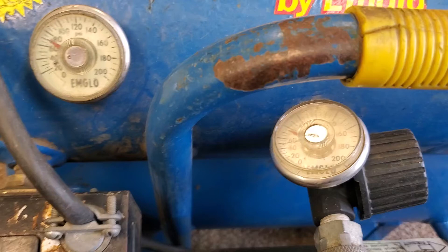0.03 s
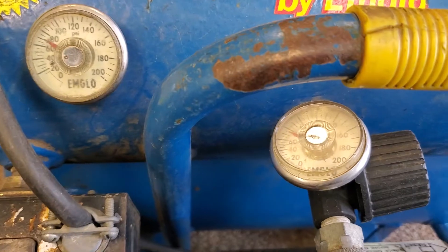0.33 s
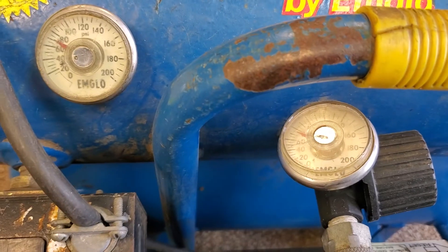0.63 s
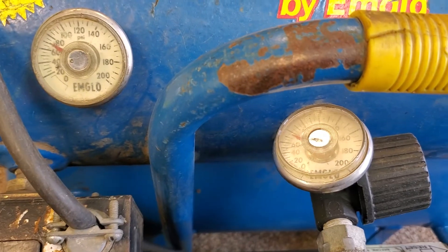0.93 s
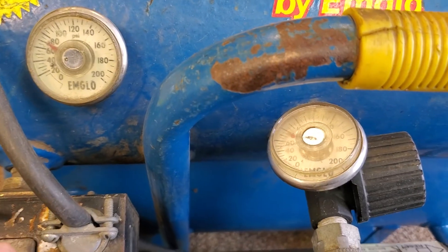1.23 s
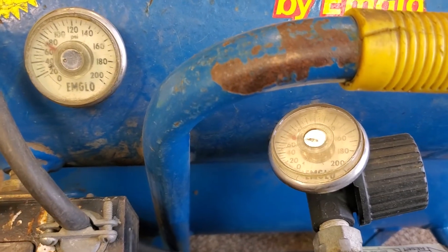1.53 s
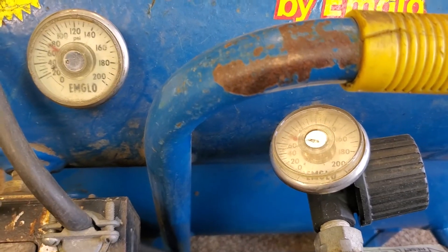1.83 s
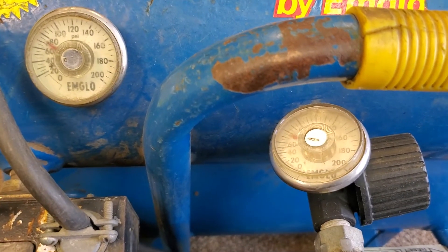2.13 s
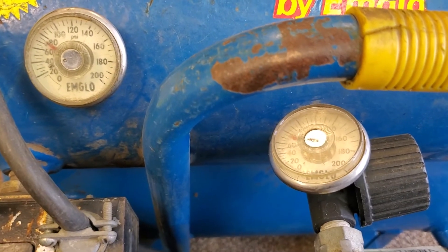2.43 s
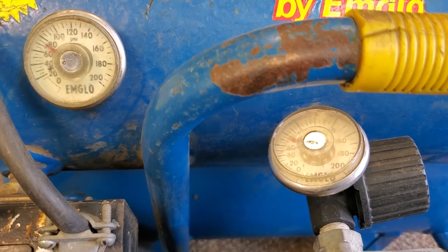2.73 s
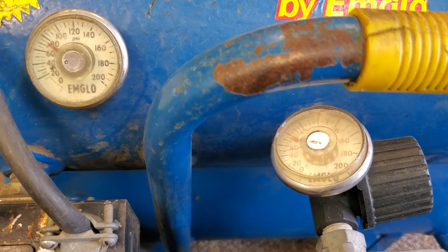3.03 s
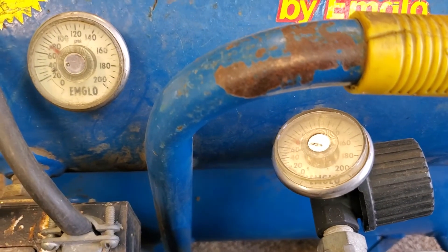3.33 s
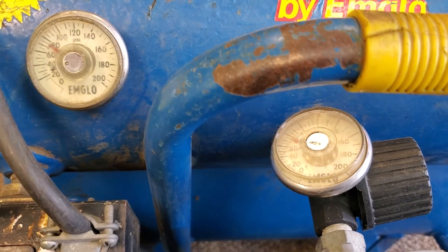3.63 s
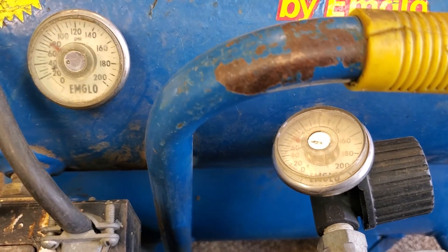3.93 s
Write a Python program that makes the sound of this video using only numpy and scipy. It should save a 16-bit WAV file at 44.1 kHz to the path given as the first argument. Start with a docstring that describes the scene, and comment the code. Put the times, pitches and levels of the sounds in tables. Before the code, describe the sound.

An air compressor snaps on and runs with a loud motor drone and hiss.

```python
"""A small piston air compressor starts in a quiet room, close by and a little to the left.
Low rumble first. At 1.1 s the switch snaps; the first strokes knock, reed valves groan and squeak, air puffs.
By 1.35 s the induction motor is at speed: a loud drone that beats with the rotor slip, over a thin hiss.
Each turn gives an intake and a discharge stroke, two gusts of air and a ringing valve click.
At 3.15 s rising pressure opens a leak and the hiss grows."""
import sys
import numpy as np
from scipy import signal
from scipy.fft import rfft, irfft, next_fast_len
from scipy.io import wavfile
from scipy.ndimage import map_coordinates

SR = 44100
rng = np.random.default_rng(int(sys.argv[2]) if len(sys.argv) > 2 else 0)


def file_out(sig):
    """Save sig as 16-bit WAV at sys.argv[1]."""
    # one column per channel
    cols = np.atleast_2d(sig).T
    # limit, then scale
    lim = np.clip(cols, -1, 1)
    pcm = np.round(lim * 32767).astype(np.int16)
    wavfile.write(sys.argv[1], SR, pcm)


N = 176400
T = np.arange(N) / SR
RUN_HZ, MAINS_HZ = 56.55, 60

# left minus right (frequency [Hz], level [dB])
BALANCE_DB = [(60, 1.2), (110, 0.4), (200, 2.3), (380, 0.7), (560, 6.4), (750, 7.5), (1290, 10), (2400, 11),
              (4400, 7.5), (7000, 10), (9300, 2.4), (10400, 10.4), (11500, 4.3), (15000, 11.9)]
# left-right likeness (frequency [Hz], correlation [0-1])
COHERENCE = [(130, 0.62), (640, 1), (1400, 0.69), (3000, 0.084)]
# shaft speed (time [s], speed [turns/s])
SHAFT_HZ = [(1.11, 6), (1.16, 20), (1.25, 41), (1.3, 55), (1.33, 56.54), (2.8, 56.54), (3.3, 56.59)]
# pump and tank resonances (frequency [Hz], width [Hz], gain [dB])
BODY_MODES = [(222, 116, -2.5), (552, 119, -0.5), (1270, 325, -21.5)]
# flow swells in one turn (place [turns], width [turns], share of depth [0-1])
GUST_SHAPE = [(.17, .13, 1), (.79, .05, .8)]

# noise spectra (frequency [Hz], relative density [dB])
RUMBLE_SPECTRUM = [(20, -12), (50, 5.5), (100, 3.5), (150, -10.5), (260, -18), (450, -31), (1000, -39.5),
                   (3000, -39), (9000, -40.5), (15000, -31)]
SNAP_SPECTRUM = [(200, -16), (1500, -6), (3000, 0), (7000, -2), (10000, -1.5), (15800, 3)]
HISS_SPECTRUM = [(1500, -16), (3500, -12), (6800, -1), (7600, -20.5), (10000, -17), (12200, 1.5),
                 (13200, 3.5), (14400, 7), (15000, 11.5), (15800, -8.5)]
AIR_SPECTRUM = [(25, -14), (90, 0), (280, -2.5), (480, 3), (610, 12.5), (780, 1), (1000, 1.5), (1230, 5),
                (1550, 1.5), (2100, 3), (2500, -2.5), (3000, 0.5), (3550, 1), (4250, -5), (5100, -9.5),
                (5800, -4), (6300, -10.5), (6800, -4), (7600, -15), (9000, -8.5), (12000, -11.5),
                (16000, -26)]
PUFF_SPECTRUM = [(1500, -24), (4500, -1.5), (6500, -5), (8000, -10), (10200, 0), (12000, -3), (14000, 2),
                 (15800, 3)]
CLICK_SPECTRUM = [(500, -45), (1800, -5), (3300, -7), (4600, 10.5), (6800, -5.5), (7800, -7), (9300, -6),
                  (12000, -3.5), (16000, -17)]
LEAK_SPECTRUM = [(2500, -27), (3250, -3), (3700, -3.5), (4300, -3.5), (5200, -11.5), (9000, -10.5),
                 (12200, -5.5), (13000, 0.5), (14000, 4), (15800, -8)]

# envelopes (time [s], level [dB])
HISS_DB = [(1.103, -30), (1.3, -38.5), (1.38, -30), (2.2, -32), (2.7, -32), (3.12, -31), (4, -29)]
DRONE_DB = [(1.127, -42), (1.15, -35.5), (1.24, -24), (1.29, -23.5), (1.35, -18), (1.5, -15.5),
            (1.9, -16.5), (2.6, -15.5), (3.0, -15), (3.4, -17), (4, -16.5)]
AIR_DB = [(1.11, 0), (1.135, -26.5), (1.17, -27), (1.205, -32.5), (1.3, -30.5), (1.37, -21.5),
          (1.44, -22.5), (1.6, -25), (2.4, -26.5), (2.95, -23.5), (3.4, -25.5), (4, -25)]
LEAK_DB = [(3.15, -39), (3.18, -26), (3.6, -26.5), (4, -25.5)]

# single events (time [s], level [dB])
SWITCH_HITS = [(1.0975, -39), (1.102, -13.5), (1.115, -26)]
KNOCK_HITS = [(1.129, -14), (1.1795, -7), (1.2235, -15), (1.2395, -10), (1.2525, -17), (1.265, -15),
              (1.321, -15), (1.3565, -15), (1.374, -15)]
AIR_PUFFS = [(1.175, -22.5), (1.22, -23), (1.23, -22), (1.253, -18), (1.263, -30), (1.275, -23),
             (1.294, -22.5), (1.314, -30), (1.332, -26)]
HARD_CLICKS = [(1.6325, -19), (1.7737, -19), (2.0923, -19), (2.9418, -17.5), (3.0825, -19), (3.8952, -18.5),
               (3.9665, -19)]

# faint rustle (time [s], width [s], level [dB])
RUSTLE_SWELL = (0.37, 0.1, -70.5)
# groaning reed (time [s], pitch [Hz], level [dB])
GROAN_PATH = [(1.105, 590, -37), (1.135, 570, -26), (1.155, 570, -27), (1.188, 605, -19), (1.203, 625, -13),
              (1.215, 650, -20), (1.224, 540, -19), (1.255, 490, -29)]
# shaft harmonics from order 1 up (relative level [dB])
HARMONICS_DB = [-6.3, 0, -8, -9, -11, -10, -16, -4.3, -5.5, -2.5, -12, -9.3, -21, -18, -25, -20, -19, -30,
                -19, -26, -20, -22, -19, -20, -25, -21, -26, -21, -25, -25]
# air noise that recurs every 8 turns (frequency [Hz], power share [0-1])
RECURRING_SHARE = [(700, .8), (3000, .25)]
# reed valve notes (time [s], pitch [Hz], width [s], level [dB], roughness [rad])
REED_NOTES = [(1.137, 720, .006, -24, 0.17), (1.156, 3170, 0.006, -19, 0.65),
              (1.175, 230, 0.012, -28, 0.12), (1.195, 313, 0.012, -27, 0.11), (1.227, 220, .008, -22, .1),
              (1.242, 130, .008, -23, .1), (1.425, 6680, .04, -28.5, 2.3)]
# valve plate modes (frequency [Hz], relative level [dB])
PLATE_MODES = [(3215, -11.5), (4260, -15.5), (5700, -21), (6680, -21)]


def amp(db):
    return 10 ** (np.asarray(db) / 20)


def unit(x):
    """Scale the channel mean to rms 1."""
    return x / np.sqrt(np.mean(np.atleast_2d(x).mean(0) ** 2) + 1e-20)


def along(points, hz):
    """Interpolate on a log frequency axis."""
    f, v = np.transpose(points)
    return np.interp(np.log(hz + 1), np.log(f + 1), v)


def level(points):
    """Gain per sample, silent before the first point."""
    return amp(np.interp(T, *np.transpose(points), left=-200))


def wobble(rate_hz):
    """Smooth random curve."""
    return map_coordinates(rng.standard_normal(int(N * rate_hz / SR) + 4), [T * rate_hz])


def filtered(x, response):
    """Apply response(hz)."""
    m = next_fast_len(N + SR // 2)
    return irfft(rfft(x, m) * response(np.fft.rfftfreq(m, 1 / SR)), m)[..., :N]


def sides(db):
    """Left and right gains for a level difference."""
    g = amp(db)
    return np.array([2 * g, 2 + 0 * g]) / (1 + g)


def placed(x, left_lag_s=.00018):
    """Pump position: louder and slightly later on the left."""
    delay_s = np.array([[.5], [-.5]]) * left_lag_s
    return filtered(x, lambda hz: sides(along(BALANCE_DB, hz)) * np.exp(-2j * np.pi * hz * delay_s))


def coloured(pair, spectrum):
    """Shape two noises into stereo, alike in the bass."""
    width = lambda hz: np.tan(np.arccos(np.clip(along(COHERENCE, hz), -1, 1)) / 2)
    mid, side = filtered(pair, lambda hz: amp(along(spectrum, hz)) * np.array([1 + 0 * hz, width(hz)]))
    return unit(np.array([mid + side, mid - side]))


def noise(spectrum):
    return coloured(rng.standard_normal((2, N)), spectrum)


def blend(a, b, share):
    """Mix by power: share(hz) of a, the rest of b."""
    return filtered(a, lambda hz: share(hz) ** .5) + filtered(b, lambda hz: (1 - share(hz)) ** .5)


def bursts(hits, t60_s):
    """Envelope of sharp, decaying hits."""
    impulses = np.zeros(N)
    for s, db in hits:
        impulses[int(np.clip(s * SR, 0, N - 1))] += amp(db)
    return signal.lfilter([1], [1, -amp(-60 / (t60_s * SR))], impulses)


def swell(at_s, width_s):
    return np.exp(-.5 * ((T - at_s) / width_s) ** 2)


def body(hz):
    """Causal response of pump and tank."""
    return sum((-1) ** k * amp(db) * 1j * hz * width / (centre ** 2 - hz ** 2 + 1j * hz * width)
               for k, (centre, width, db) in enumerate(BODY_MODES))


def shaft(discharge_s=2.0553):
    """Speed and turn count; whole turns fall on discharge strokes."""
    speed_hz = np.interp(T, *np.transpose(SHAFT_HZ))
    turns = np.cumsum(speed_hz) / SR
    return speed_hz, turns - np.interp(discharge_s, T, turns)


def slip_rad(s, peak_s=1.51):
    """Beat phase between the mains field and the lagging rotor."""
    return 2 * np.pi * 2 * (MAINS_HZ - RUN_HZ) * (s - peak_s)


def gust(turns, depth_db):
    """Flow swells twice a turn: after discharge, after intake."""
    swells = sum(share * np.exp(-.5 * (((turns - at + .5) % 1 - .5) / width) ** 2)
                 for at, width, share in GUST_SHAPE)
    return unit(amp(depth_db * swells))


def rumble(level_db=-60, swing_db=1, from_s=.1):
    """Low room background with one faint rustle."""
    fade_in = np.clip((T - from_s) / .005 + 1, 0, 1)
    low = noise(RUMBLE_SPECTRUM) * amp(level_db + swing_db * wobble(11)) * fade_in
    at_s, width_s, db = RUSTLE_SWELL
    return low + noise(SNAP_SPECTRUM) * amp(db) * swell(at_s, width_s)


def switch():
    """The switch ticks and snaps shut."""
    return unit(placed(noise(SNAP_SPECTRUM))) * bursts(SWITCH_HITS, t60_s=.038)


def room(x, level_db=-7, t60_s=.24):
    """Short diffuse tail per channel."""
    t = T[:SR // 2]
    tail = rng.standard_normal((2, len(t))) * amp(-60 * t / t60_s) * (t > .004)
    return amp(level_db) * signal.fftconvolve(x, tail / np.linalg.norm(tail[0]), axes=1)[:, :N]


def jet(spectrum, left_db=23):
    """Air escaping near the left port."""
    return unit(noise(spectrum) * sides(left_db)[:, None])


def hiss(flow):
    """Thin, pulsing stream of air."""
    return jet(HISS_SPECTRUM) * level(HISS_DB) * flow


def groan(rough_rad=.3):
    """A reed groans under the first slow strokes; pitch climbs, then sags."""
    s, hz, db = np.transpose(GROAN_PATH)
    phase = 2 * np.pi * np.cumsum(np.interp(T, s, hz)) / SR + rough_rad * wobble(250)
    return amp(np.interp(T, s, db, left=-200, right=-200)) * np.sin(phase)


def drone(speed_hz, turns, intake_turn=.51, intake_top_hz=300, tank_order=10, unloaded_orders=(3, 10)):
    """Harmonics of a dull intake and a ringing discharge; the upper ones beat with the slip."""
    orders = np.arange(len(HARMONICS_DB)) + 1
    unloaded_db = 5 * np.exp(-np.maximum(T - 1.38, 0) / .52)  # fades as pressure builds
    slip = slip_rad(T)
    tank_throb = 1 + .15 * np.cos(slip) + .1 * np.cos(2 * slip)
    tone = np.zeros(N)
    for k in orders:
        hz = k * RUN_HZ
        intake = 2 * np.exp(-(hz / intake_top_hz) ** 2 - 2j * np.pi * k * intake_turn)
        beat = tank_throb if k == tank_order else 1 + .22 * (hz > 540) * np.exp(1j * slip)
        waver = (.03 + .003 * k) * (wobble(23.92) + 1j * wobble(24.03))
        frame_scatter_rad = rng.uniform(-1, 1) * (np.pi if hz > 720 else .25)
        phase = 2 * np.pi * k * turns + np.angle(-body(hz) - intake) + frame_scatter_rad
        db = np.interp(k * speed_hz / RUN_HZ, orders, HARMONICS_DB)
        db += unloaded_db * (k in unloaded_orders)
        tone += amp(db) * ((beat + waver) * np.exp(1j * phase)).real
    limp = 1 + .05 * np.cos(np.pi * turns)  # every other turn is stronger
    return placed(unit(tone) * limp * level(DRONE_DB))


def rattle(turns, period_turns):
    """Two noise loops locked to the shaft."""
    size = int(period_turns * SR / RUN_HZ)
    index = turns / period_turns % 1 * size
    loops = rng.standard_normal((2, size))
    return np.array([map_coordinates(loop, [index], mode="grid-wrap") for loop in loops])


def air(turns, flutter_db=.6):
    """Air and rattle in the pump: part recurs each turn, part about each slip beat, part is new."""
    turn_share = lambda hz: .18 * along([(1300, 0), (1800, 1), (7000, .1)], hz)
    beat_share = lambda hz: along(RECURRING_SHARE, hz)
    loose = blend(rattle(turns, period_turns=8), rng.standard_normal((2, N)), beat_share)
    mix = blend(rattle(turns, period_turns=1), loose, turn_share)
    rush = unit(placed(coloured(mix, AIR_SPECTRUM)))
    return rush * gust(turns, depth_db=4) * amp(flutter_db * wobble(29.84)) * level(AIR_DB)


def knocks(low_cut_hz=199):
    """Heavy first strokes knock on the tank."""
    blows = bursts(KNOCK_HITS, t60_s=.0014)
    thuds = filtered(blows, lambda hz: -body(hz) * hz / (hz - 1j * low_cut_hz))
    peak_db = max(db for s, db in KNOCK_HITS)
    return amp(peak_db) * thuds / np.abs(thuds).max()


def reeds():
    """Reed valves squeak, honk and rasp as flow begins."""
    return sum(amp(db) * swell(s, width_s) * np.sin(2 * np.pi * hz * T + rough_rad * wobble(600))
               for s, hz, width_s, db, rough_rad in REED_NOTES)


def puffs(width_s=.0044):
    """Air escapes in puffs on the first turns."""
    return jet(PUFF_SPECTRUM) * sum(amp(db) * swell(s, width_s) for s, db in AIR_PUFFS)


def valve(turns, from_s=1.35, lag_s=.0014, jitter_s=.00008, t60_s=.008):
    """The discharge valve slaps shut once a turn; its force swings at twice the slip beat."""
    shut_s = T[1:][np.diff(np.floor(turns)) > 0] + lag_s
    shut_s = shut_s[shut_s > from_s]
    late, hard = rng.standard_normal((len(shut_s), 2)).T
    shut_s += jitter_s * late
    db = -20.5 + .6 * hard + 1.6 * np.cos(2 * slip_rad(shut_s))
    crack = np.cos(np.angle(signal.hilbert(noise(CLICK_SPECTRUM))))  # flat-envelope noise
    envelope = np.maximum(bursts(zip(shut_s, db), t60_s), bursts(HARD_CLICKS, t60_s))
    return unit(placed(crack)) * envelope + plate(shut_s, db)


def plate(shut_s, click_db, t60_s=.07, rise_db_per_s=.5):
    """The valve plate rings after each click, more as pressure rises."""
    force = amp(click_db + rise_db_per_s * (shut_s - shut_s.mean()))
    blows = np.bincount((shut_s * SR).astype(int), force, N)[:N]
    t = T[:SR // 2]
    ring = sum(amp(db - 60 * t / t60_s) * np.sin(2 * np.pi * hz * t) for hz, db in PLATE_MODES)
    return placed(signal.fftconvolve(blows, ring)[:N])


def leak(flow):
    """Rising pressure opens a second pulsing jet."""
    return jet(LEAK_SPECTRUM) * level(LEAK_DB) * flow


def scene(first_stroke_s=1.1285, flutter_db=1.1):
    """Switch first; drone and air enter with the first stroke. Only the mechanics reverberate."""
    speed_hz, turns = shaft()
    mechanics = switch() + placed(knocks() + reeds() + groan()) + valve(turns)
    pumping = np.clip((T - first_stroke_s) / .001, 0, 1)
    pump = (drone(speed_hz, turns) + air(turns)) * pumping
    flow = gust(turns, depth_db=3) * amp(flutter_db * wobble(220))
    jets = puffs() + hiss(flow) + leak(flow)
    return pump + jets + mechanics + room(mechanics) + rumble()


def record(dry, ceiling=.8, top_hz=15850):
    """Soft peak limit, then low-pass."""
    rounded = dry / (1 + np.abs(dry / ceiling) ** 8) ** (1 / 8)
    return filtered(rounded, lambda hz: np.clip((top_hz - hz) / 100 + .5, 0, 1))


dry = scene()
out = record(dry)
file_out(out)
```